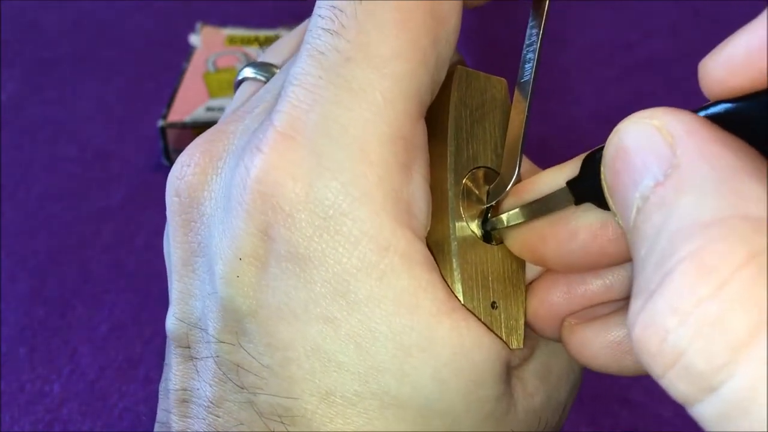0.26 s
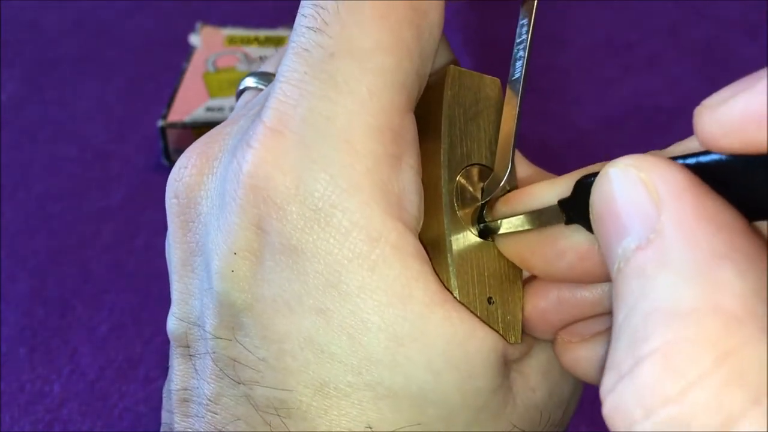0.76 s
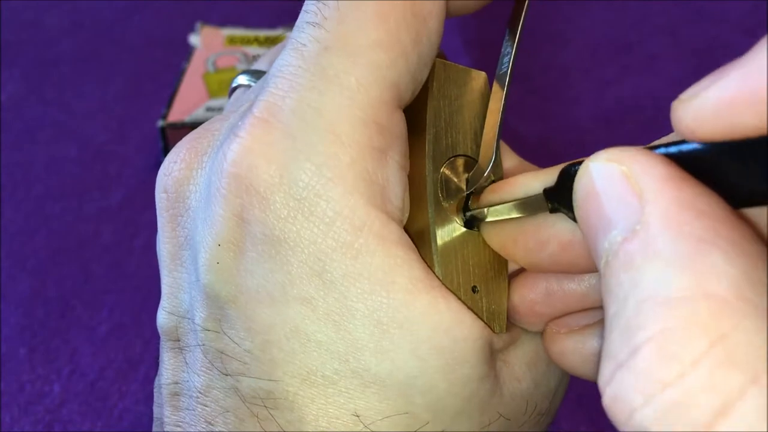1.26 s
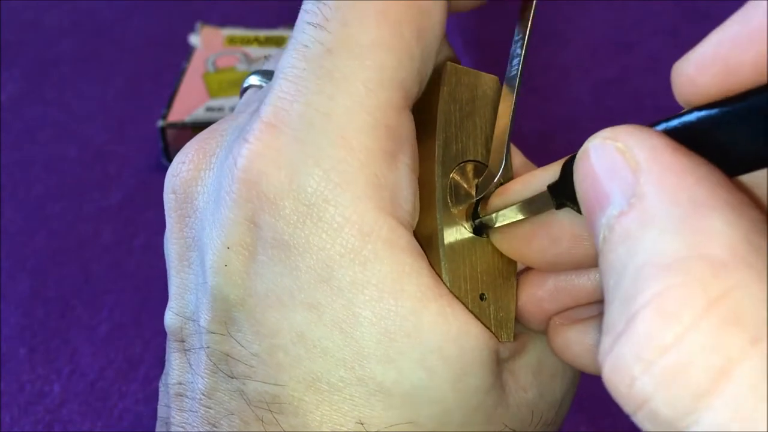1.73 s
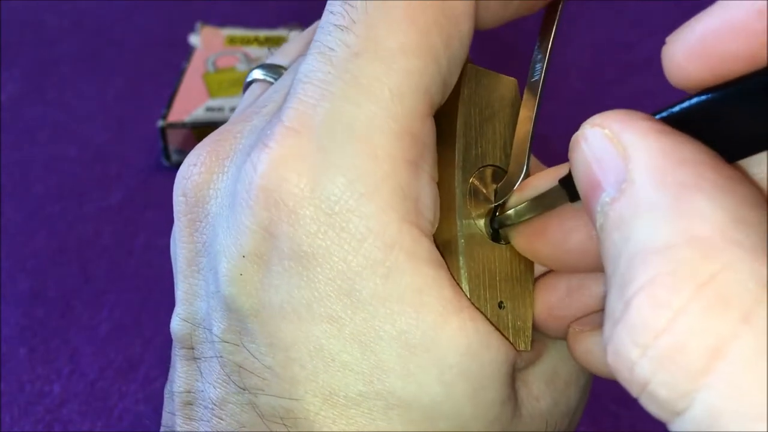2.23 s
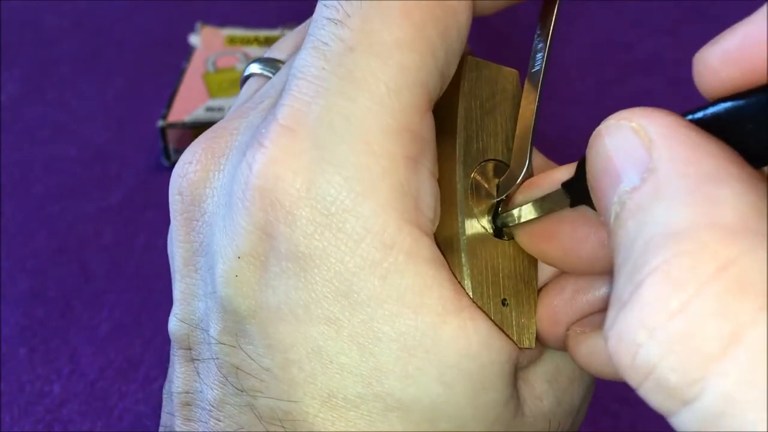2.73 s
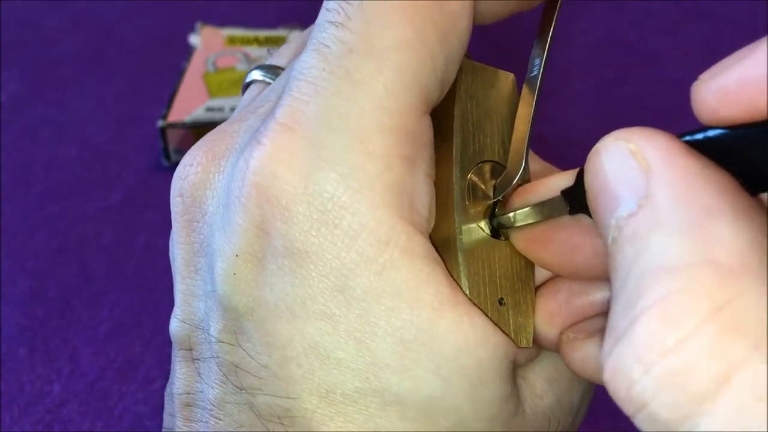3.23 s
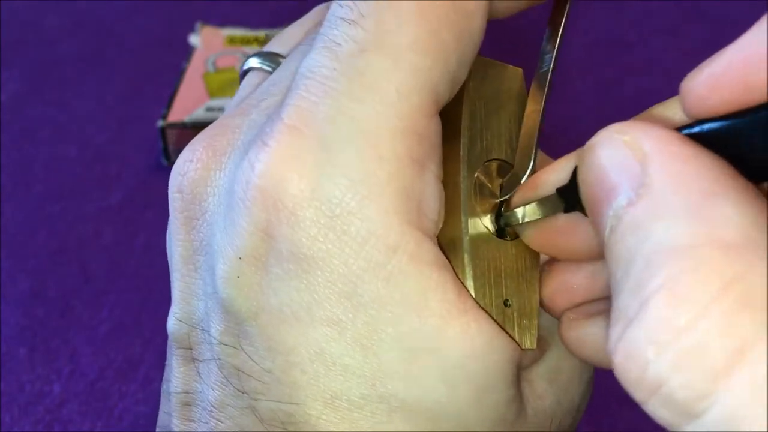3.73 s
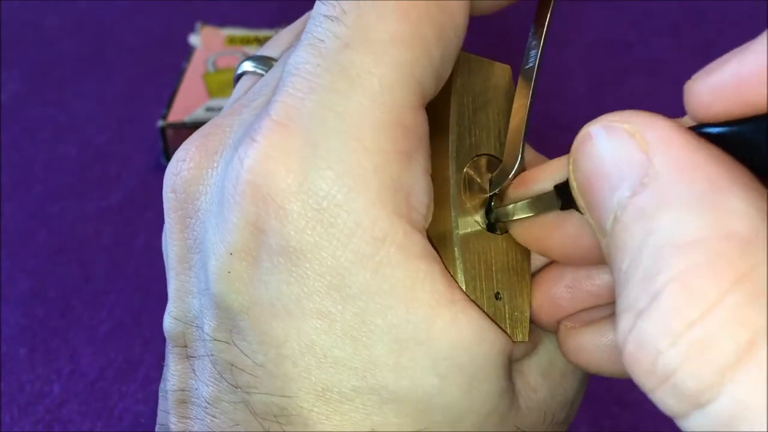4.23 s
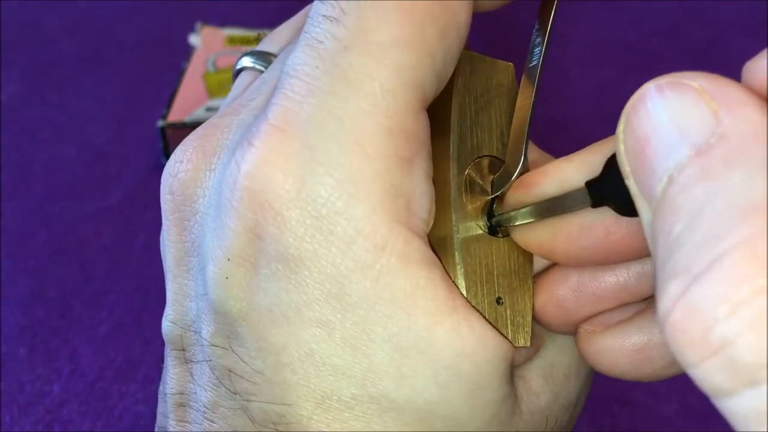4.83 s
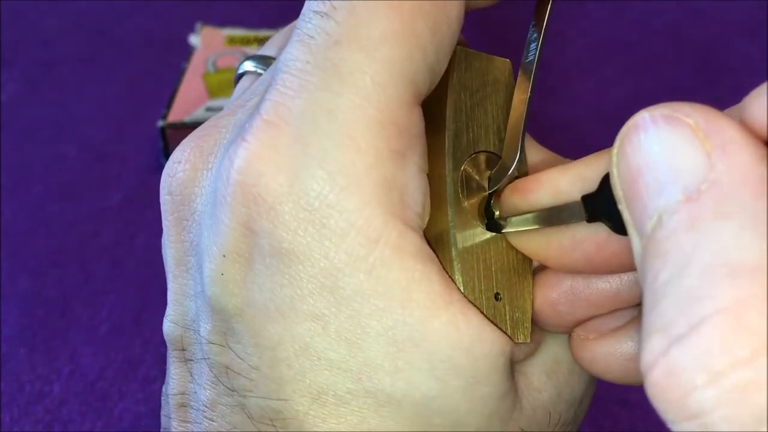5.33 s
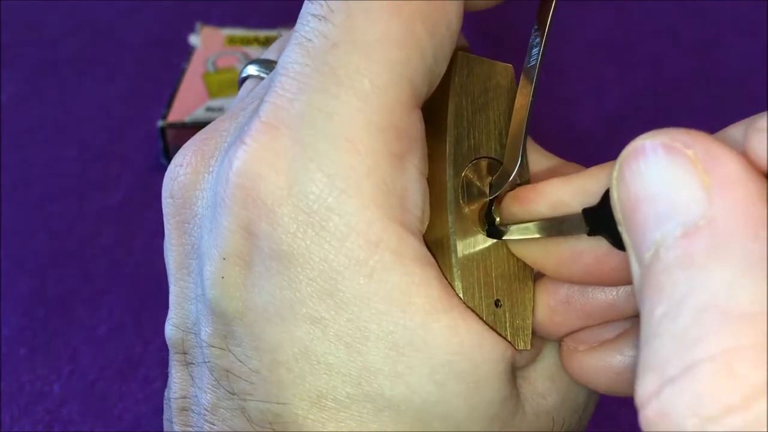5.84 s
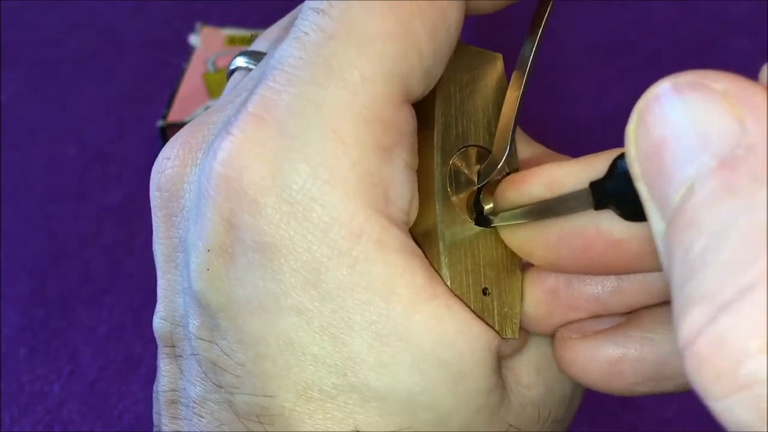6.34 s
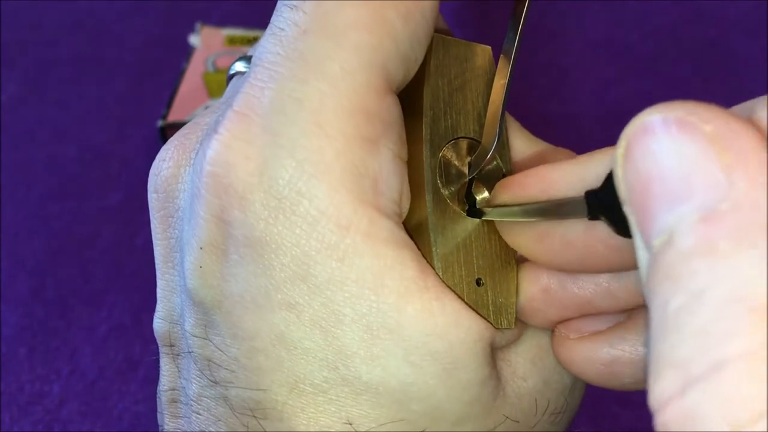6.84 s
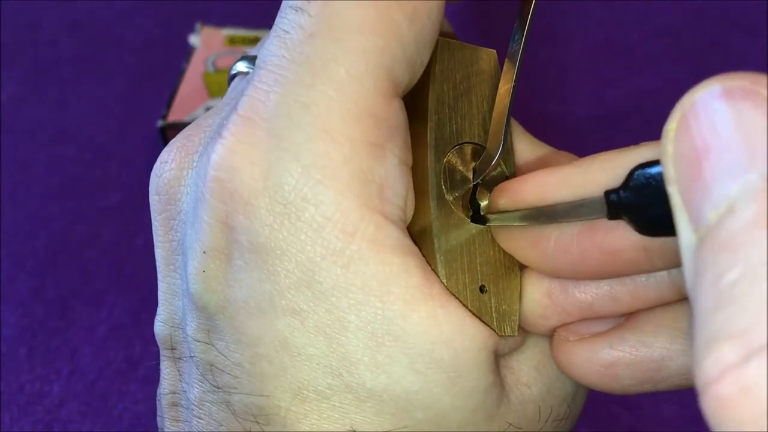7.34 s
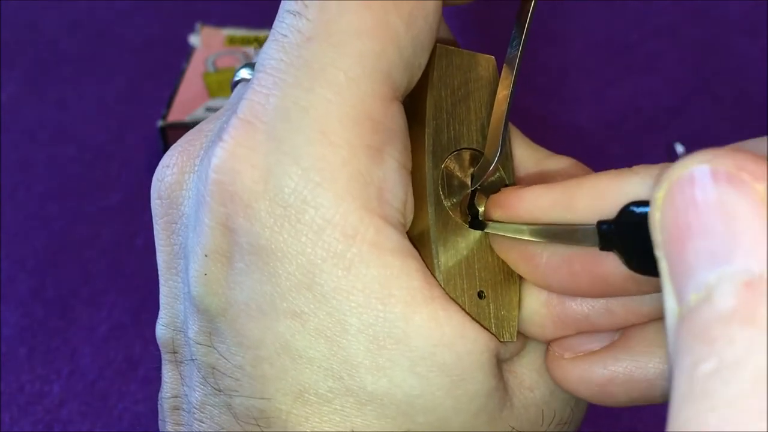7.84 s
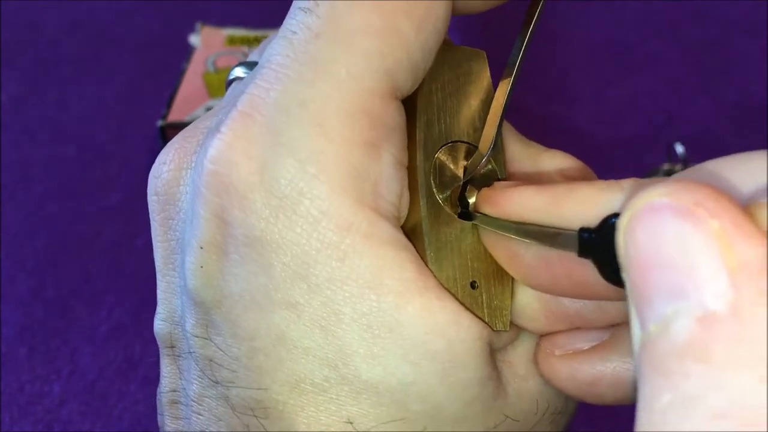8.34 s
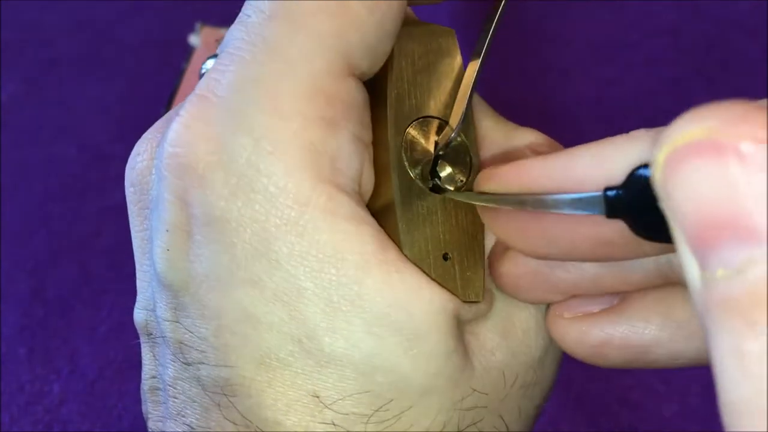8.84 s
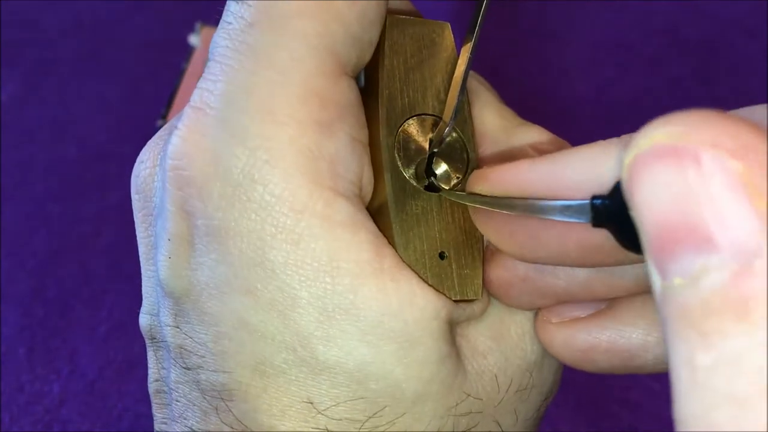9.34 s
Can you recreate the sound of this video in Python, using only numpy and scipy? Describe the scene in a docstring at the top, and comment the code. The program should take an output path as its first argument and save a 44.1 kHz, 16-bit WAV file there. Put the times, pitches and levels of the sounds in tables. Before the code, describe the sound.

Close-up lock picking: crisp steely clicks, a few very loud, separated by quiet pauses, then busier faint ticking, scraping and low bumps.

```python
"""A steel pick and a tension wrench work the pins of a small brass padlock held over a table.
Pins snap in tight clusters of impacts, each a burst of force that rings the steel and knocks the brass.
The pick ticks and scrapes in the keyway by stick-slip, and soft pushes of the hands swing the table's modes.
The room is small and quiet, with shaped-noise rumble, hiss and a faint reverberant tail on the impacts.
Each loud snap throws the recorder into its hissier high range for a moment."""
import sys
import numpy as np
from scipy import signal
from scipy.fft import rfft, irfft
from scipy.io import wavfile
from scipy.ndimage import uniform_filter1d

SR = 44100
rng = np.random.default_rng(int(sys.argv[2]) if len(sys.argv) > 2 else 0)


def master(y):
    """Save y as 16-bit WAV."""
    cut = np.clip(np.atleast_2d(y).T, -1, 1)
    pcm = np.round(cut * 32767)  # scale
    wavfile.write(sys.argv[1], SR, pcm.astype(np.int16))


N = 422478


def amp(db):
    """Decibels to gain."""
    return 10 ** (np.asarray(db) / 20)


def unit(x):
    """Scales to rms 1."""
    return x / np.sqrt(np.mean(x ** 2) + 1e-20)


def read(points, hz):
    """Interpolates a (frequency, value) table on a log-frequency axis."""
    table_hz, value = np.transpose(points)
    return np.interp(np.log(hz + 1e-9), np.log(table_hz), value)


def add(mix, start_s, sound):
    """Mixes in a sound at a given time, cut off where the mix ends."""
    part = mix[max(round(start_s * SR), 0):][:len(sound)]
    part += sound[:len(part)]


def noise(spectrum):
    """Steady noise of a given colour, rms 1: white noise weighted in the frequency domain."""
    gain = amp(read(spectrum, np.fft.rfftfreq(N, 1 / SR)))
    return unit(irfft(rfft(rng.standard_normal(N)) * gain, N))


def causal(spectrum, size=1024):
    """Minimum-phase pulse: the sharpest causal pulse that has a given spectrum."""
    log_gain = np.log(amp(read(spectrum, abs(np.fft.fftfreq(size, 1 / SR)))))
    # the Hilbert transform of the log gain gives the phase
    pulse = np.fft.ifft(np.exp(np.conj(signal.hilbert(log_gain)))).real
    return pulse[:size // 2]


def ring(modes, size=512):
    """Impulse response of damped resonances; neighbours swing in opposite directions."""
    t = np.arange(size) / SR
    out = np.zeros(size)
    for k, (hz, width_hz, db) in enumerate(modes):
        decay = np.exp(-np.pi * width_hz * t)
        # scaling by the width keeps the height of the spectral peak at the table's level
        out += (-1) ** k * amp(db) * width_hz * decay * np.sin(2 * np.pi * hz * t)
    return out


def room_floor(level_db=-66):
    """Steady room rumble and microphone hiss: one bed of coloured noise."""
    # colour of the bed: (frequency [Hz], relative density [dB per Hz])
    floor_colour = [(15, -36), (30, -15.5), (58, -0.5), (90, -7.5), (190, -12), (350, -16), (550, -22.5),
                    (1400, -28), (3500, -30), (4900, -34), (6000, -30), (7800, -32.5), (9400, -29.5),
                    (10400, -33.5), (11500, -28.5), (15500, -29.5)]
    return amp(level_db) * noise(floor_colour)


def high_range(x, hiss_db=-61.5, trigger_db=-20, hold_s=.408):
    """A loud peak switches the recorder to a hissier range, which it holds for a while."""
    # hiss of the high range: (frequency [Hz], relative density [dB per Hz])
    hiss_colour = [(20, -11), (100, -3), (300, -3.5), (730, -12), (2500, -14), (5000, -16), (15500, -16.5)]
    # power averaged over a millisecond
    loud = uniform_filter1d(x ** 2, 44) > amp(trigger_db) ** 2
    t = np.arange(N) / SR
    last_peak_s = np.maximum.accumulate(np.where(loud, t, -10))
    # short ramps soften the switching
    held = uniform_filter1d(1. * (t - last_peak_s < hold_s), size=128)
    return x + amp(hiss_db) * held * noise(hiss_colour)


def room(x, wet_db=-19, gap_s=.003, size=256):
    """A faint diffuse tail: noise that decays at its own rate in each band, the top treble fastest."""
    # decay of the room: (frequency [Hz], time to fall 60 dB [s])
    decay_times = [(150, 0.9), (1000, 0.26), (3000, 0.4), (7000, 0.33), (15500, 0.16)]
    # colour of the room: (frequency [Hz], gain [dB])
    room_colour = [(100, -1.5), (1000, 5), (3000, 2), (6000, -2.5), (9000, -7.5), (11700, -8), (15500, -6)]
    hz, t, bands = signal.stft(rng.standard_normal(SR // 2), SR, nperseg=size)
    decay = amp(-60 * t / read(decay_times, hz)[:, None])
    tail = signal.istft(bands * decay, SR, nperseg=size)[1]
    # silence for half the gap, then a fade-in as long as the gap
    tail *= np.clip(np.arange(len(tail)) / SR / gap_s - .5, 0, 1)
    colour = amp(read(room_colour, np.fft.rfftfreq(len(tail), 1 / SR)))
    tail = irfft(rfft(tail / np.linalg.norm(tail)) * colour)
    return amp(wet_db) * signal.fftconvolve(x, tail)[:N]


def bumps(low_cut_hz=65, size=16000):
    """A soft push sets the table's low modes swinging; a quicker push reaches higher ones."""
    # soft bumps of hands and lock: (time [s], peak level [dB], pitch of the push [Hz])
    pushes = [(1.094, -46, 100), (2.578, -35, 185), (3.193, -45, 161), (4.384, -51.5, 70), (4.520, -47, 40),
              (6.078, -38.5, 89.7), (6.553, -55, 200), (8.215, -38, 110), (8.238, -30, 75.6),
              (8.662, -45, 150), (8.694, -47, 240), (8.739, -45, 247)]
    # modes of the table: (frequency [Hz], relative level [dB], time to fall 60 dB [s])
    table_modes = [(65, -2, .3), (83.94, -9, 0.12), (109, 0.5, 0.25), (129.79, -4.5, 0.22),
                   (157, -6.5, .28), (198.6, -3.5, .22), (288.8, -4, 0.1), (400, -1.5, 0.044),
                   (526, -0.5, .04), (1070, -0.5, .03)]
    out, t = np.zeros(N), np.arange(size) / SR
    table = sum(amp(db - 60 * t / t60) * np.sin(2 * np.pi * hz * t) for hz, db, t60 in table_modes)
    # the slowest motion radiates no sound
    low_cut = signal.butter(3, low_cut_hz, "high", fs=SR, output="sos")
    table = signal.sosfilt(low_cut, table)
    for start_s, db, hz in pushes:
        u = 2 * np.pi * hz * t
        push = u * (2 - u) * np.exp(-u)
        thud = signal.fftconvolve(push, table)[:size]
        add(out, start_s, amp(db) * thud / abs(thud).max())
    return out


def scrapes(slips_per_s=400, slip_spread_db=5):
    """Tiny stick-slip catches, random in time, sign and strength, ring the pick as it slides."""
    # strokes of the pick along the keyway: (start [s], end [s], level [dB])
    strokes = [(0.549, 0.593, -72), (4.333, 4.354, -65), (6.48, 6.532, -69), (6.681, 6.747, -75),
               (8.62, 8.664, -66), (8.674, 8.734, -69), (8.873, 8.945, -62.5)]
    # resonances of sliding steel: (frequency [Hz], width [Hz], relative level [dB])
    slide_modes = [(4160, 590, 0), (5920, 560, 4), (12760, 850, 4.5), (14600, 970, -16)]
    caught = rng.random(N) < slips_per_s / SR
    strength = amp(slip_spread_db * rng.standard_normal(N))
    slips = caught * rng.choice([-1, 1], N) * strength
    grit = signal.oaconvolve(slips, ring(slide_modes))[:N]
    for start_s, end_s, db in strokes:
        stroke = unit(grit[round(start_s * SR):round(end_s * SR)])
        # each stroke fades in and out
        add(out := np.zeros(N) if start_s == strokes[0][0] else out, start_s,
            amp(db) * stroke * signal.windows.tukey(len(stroke), .5))
    return out


def impacts():
    """Every metal contact as (time [s], relative level [dB], knock against ring [dB], knock pitch [Hz])."""
    # single touches of pick or wrench in the keyway: (time [s], relative level [dB],
    # brass knock against bright ring [dB], knock pitch [Hz])
    ticks = [ (0.426, -43, 6.5, 6400), (0.4473, -24, -30, 3000), (0.7397, -44, -17, 3000),
             (1.0875, -19, -14, 3000), (2.2273, -42, -25, 4500), (2.4205, -23, -8.5, 6540),
             (2.4485, -44, -16.5, 3000), (3.8262, -35.5, -11.5, 2000), (4.2131, -43, -12, 1990),
             (4.3168, -32.5, -20, 3000), (4.4030, -63, 11, 800), (4.4235, -55, 1, 3000),
             (4.5109, -23.5, -23.5, 2000), (5.2809, -48, 5, 1603), (6.5531, -43, -13, 6000),
             (6.6825, -46.5, -7, 5010), (6.8466, -46, -9, 5000), (7.8900, -49, 11.5, 1454),
             (8.1576, -36.5, 5, 1650), (8.613, -31.5, -22.5, 4060), (8.7728, -24.5, -11.5, 5990),
             (8.9847, -37.5, -4, 6000), (9.0057, -32.5, -11, 1820), (9.0395, -52.5, 3, 1396)]
    # a pin or the pick lets go and rattles through evenly spaced contacts, in equal level steps:
    # (time [s], relative level of the first contact [dB], contacts [count], gap [s], step [dB],
    # brass knock against bright ring [dB], knock pitch [Hz])
    rattles = [ (1.0696, -21, 5, .00095, 3.5, -19, 2670), (1.0919, -27, 3, 0.0018, 10, -18, 3150),
               (1.4040, -23.5, 2, 0.0029, 0, -22, 2500), (1.6785, -7.5, 4, 0.0011, -1.2, -29.5, 5500),
               (3.1953, -2.5, 2, 0.001, 0, -21.5, 1890), (3.7260, -35, 2, 0.0079, 0.5, -6.5, 7250),
               (4.2912, -48.5, 2, 0.0062, 7, -14, 2800), (4.3720, -48.5, 3, 0.003, -2.5, 12, 880),
               (4.4969, -26, 3, 0.0038, 3.2, -16.5, 2630), (6.0652, -3, 2, 0.0015, 1, -20.5, 1900),
               (6.307, -33, 2, 0.0022, 1, -12, 2520), (6.5004, -42.5, 3, 0.0088, -0.5, -20, 4000),
               (8.2352, -3.5, 3, 0.00063, 0, -12.5, 3687), (8.6348, -36, 2, 0.012, -2, -17, 4000),
               (8.7208, -35, 2, .0069, -5, -15, 5000), (8.9072, -45.5, 3, .0042, -1, -1.5, 5470),
               (8.9361, -38, 2, .0138, -5, -2.5, 5500), (9.2760, -38, 2, 0.0042, 7, -11, 1995)]
    contacts = list(ticks)
    for start_s, db, count, gap_s, step_db, knock_db, hz in rattles:
        for k in range(round(count)):
            contacts.append((start_s + k * gap_s, db + k * step_db, knock_db, hz))
    return contacts


def clicks(ring_db=13.0, knock_db=8.5, chatter=0.29, chatter_s=0.00088, slip_s=.00035, size=512):
    """A brief slip, a hard contact and a millisecond of chatter ring the steel and knock the brass."""
    # ring of pick and pins, main resonances above 11 kHz: (frequency [Hz], relative density [dB per Hz])
    steel_ring = [(100, -35.5), (1500, -34), (2700, -24.5), (3250, -17.5), (3900, -23), (5000, -13.5),
                  (6100, -11.5), (8000, -13), (9100, -8), (10200, -10.5), (11600, 1), (12400, -3.5),
                  (13200, -1.5), (15500, -1)]
    # dead knock of the hand-held brass body: (multiple of the knock pitch [ratio],
    # relative density [dB per Hz])
    brass_knock = [(.02, -18), (.2, -8.5), (.55, -6.5), (.8, -1), (1.1, 1), (2, -6), (4, -9.5), (10, -21)]
    lead = 64  # samples of slip ahead of the contact
    out, t = np.zeros(N), (np.arange(size) - lead) / SR
    steel = causal(steel_ring)
    # chatter grows through the slip and dies after the contact
    envelope = np.exp(-np.maximum(t / chatter_s, -t / slip_s))
    for start_s, db, body_db, hz in impacts():
        force = chatter * rng.standard_normal(size) * envelope
        force[lead] = 1  # the hard contact
        brass = causal(np.array(brass_knock) * [hz, 1])
        for body, level_db in (steel, ring_db), (brass, body_db + knock_db):
            sound = np.convolve(force, body)
            # equal energy before the level is set
            add(out, start_s + t[0], amp(db + level_db) * sound / np.linalg.norm(sound))
    return out


def scene(count=4):
    """The lock close to the microphone, the table under it and the quiet room."""
    # the lock radiates a different pattern towards each wall, and each comes back by its own paths
    walls = sum(room(clicks()) for _ in range(count)) / np.sqrt(count)
    return (room_floor() + walls + bumps() + scrapes() + clicks())[None]


def record(dry, edge_hz=15950):
    """Range switching, the converter's ceiling, then the band limit."""
    low_pass = signal.firwin(255, edge_hz, window=("kaiser", 7), fs=SR)
    clipped = np.clip(high_range(dry[0]), -1, 1)
    return signal.oaconvolve(clipped, low_pass, "same")[None]


dry = scene()
out = record(dry)
master(out)
```